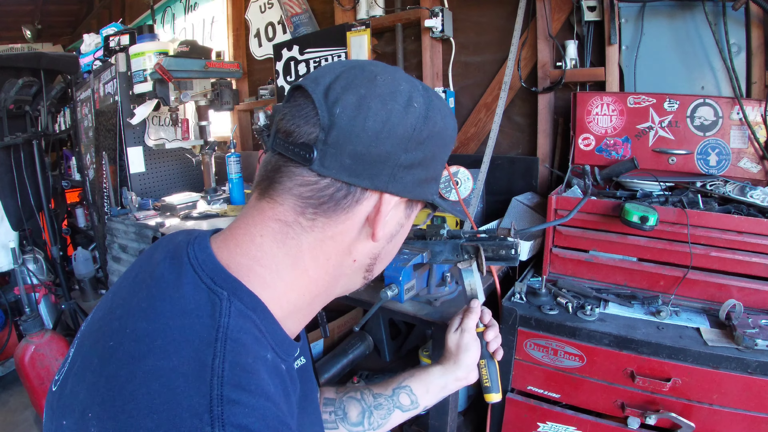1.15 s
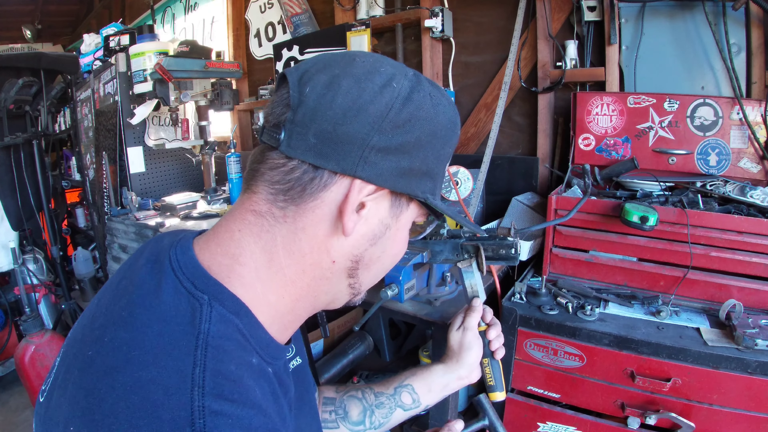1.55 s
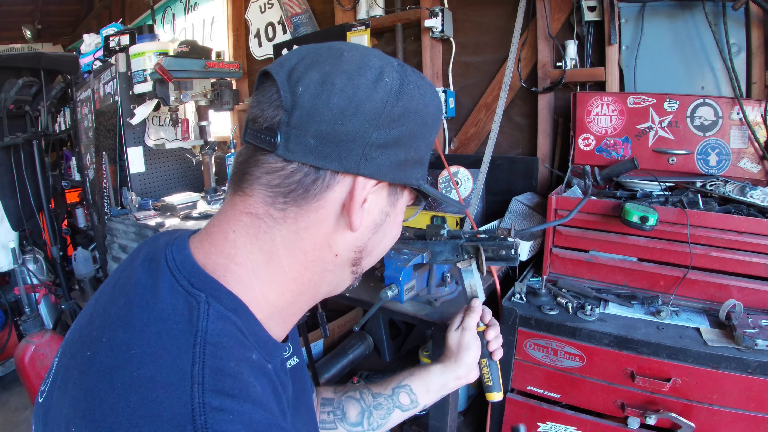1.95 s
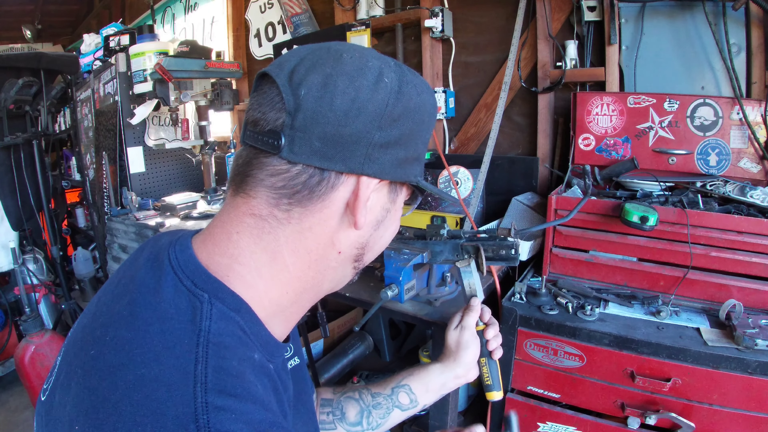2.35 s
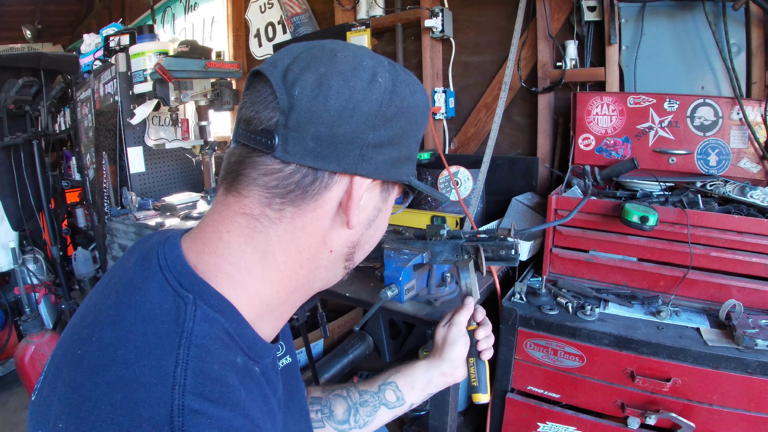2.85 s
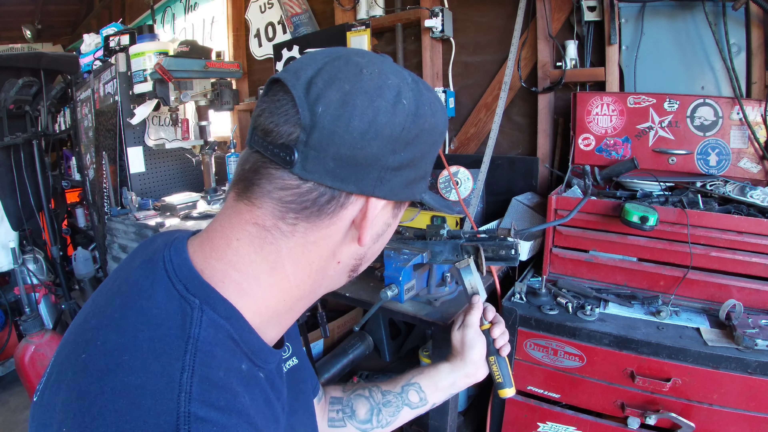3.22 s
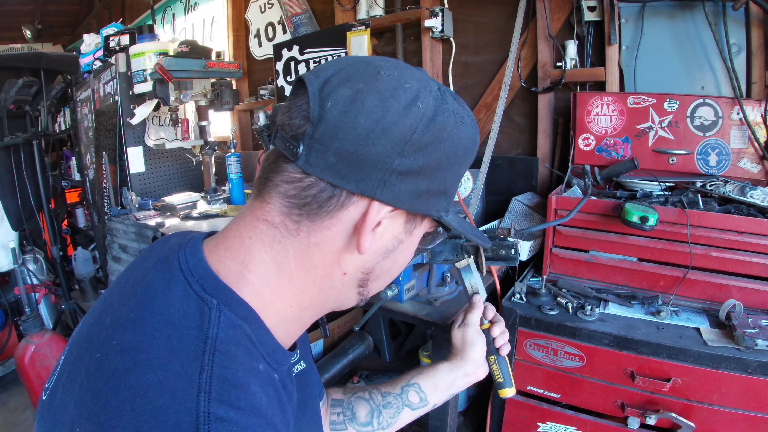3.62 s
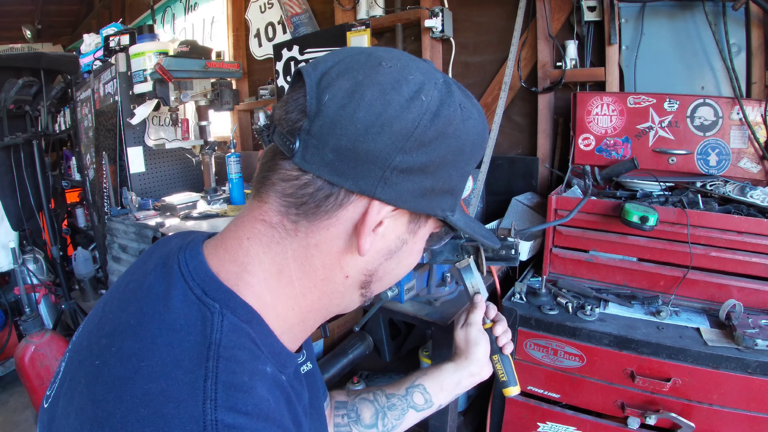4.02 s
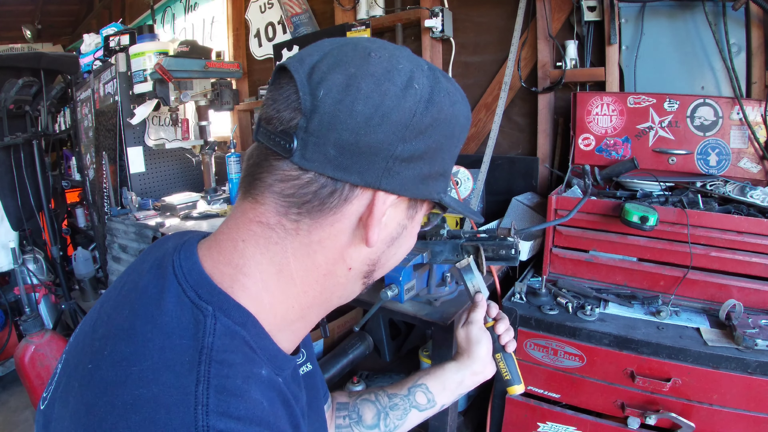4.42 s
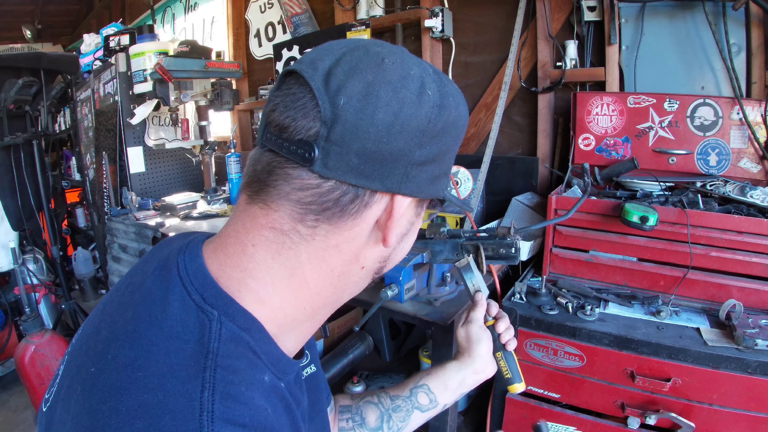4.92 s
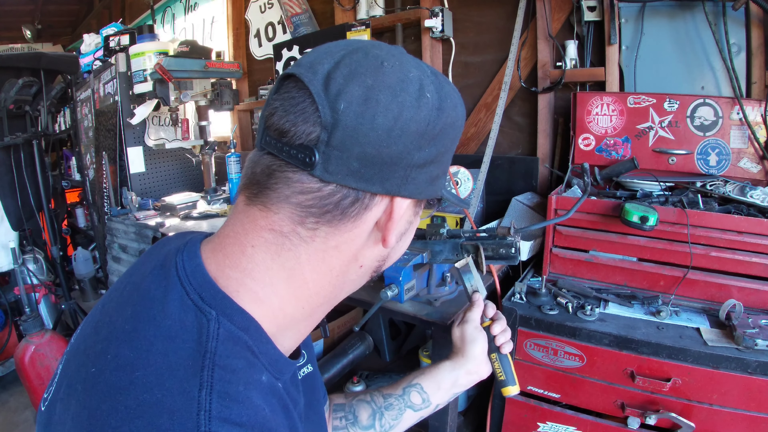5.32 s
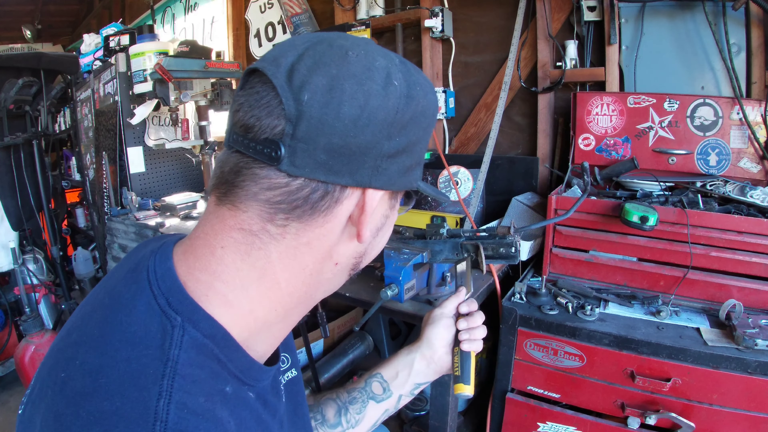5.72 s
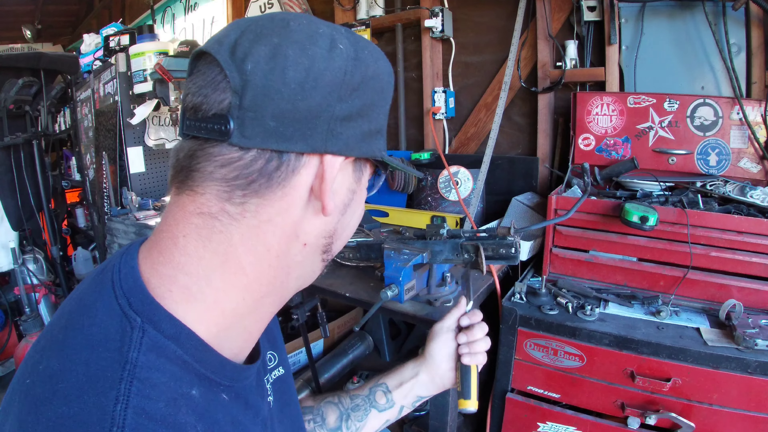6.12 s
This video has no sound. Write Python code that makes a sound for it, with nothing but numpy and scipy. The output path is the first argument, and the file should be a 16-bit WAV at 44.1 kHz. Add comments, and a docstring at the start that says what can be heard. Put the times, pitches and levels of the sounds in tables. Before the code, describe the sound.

Light steel taps and creaks, then two bursts of sharp hammer blows on a screwdriver against clamped steel, loose tools rattling on a garage bench.

```python
"""Light steel taps and short creaks over a faint garage drone, then two bursts of hammer blows.
A hammer drives a screwdriver against a steel bracket in a vise: each blow cracks in the shaft, rings
the steel and shakes the workbench, whose loose tools chatter and clink while a metal panel hums on.
Between bursts the blade is set anew with taps and creaks; a few more taps close the scene.
Struck bodies are resonances and decaying sines; rough contacts are shaped noise."""
import sys
import numpy as np
from scipy import signal
from scipy.fft import rfft, irfft
from scipy.io import wavfile
from scipy.ndimage import uniform_filter1d, minimum_filter1d, map_coordinates

SR = 44100
rng = np.random.default_rng(int(sys.argv[2]) if len(sys.argv) > 2 else 0)


def log_audio(samples):
    """Write samples as a 16-bit WAV file to the path given in sys.argv[1]."""
    # one column per channel
    frames = np.atleast_2d(samples).T
    # limit to full scale, then quantise
    limited = np.clip(frames, -1, 1)
    pcm = np.round(limited * 32767).astype(np.int16)
    wavfile.write(sys.argv[1], SR, pcm)


N = 280917  # length of the scene in samples
T = np.arange(SR) / SR  # seconds since a contact
HZ = np.fft.rfftfreq(2 * SR, 1 / SR)  # frequency grid of all responses
TOP_HZ = 15400  # upper band limit of the output, also the highest jingle pitch


def amp(db):
    """Decibels to gain."""
    return 10 ** (np.asarray(db) / 20)


def unit(x):
    """Scale x to rms 1."""
    return x / np.sqrt(np.mean(x ** 2) + 1e-20)


def along(points, hz):
    """Read a curve of (Hz, value) points at hz, straight lines on a log frequency axis."""
    point_hz, values = np.transpose(points)
    return np.interp(np.log(hz + 1), np.log(point_hz + 1), values)


def resonances(modes):
    """Causal response of damped (Hz, width Hz, peak dB) modes, with alternating signs."""
    response = 0
    for k, (hz, width, db) in enumerate(modes):
        mode = 1j * HZ * width / (hz * hz - HZ ** 2 + 1j * HZ * width)
        response = response + (-1) ** k * amp(db) * mode
    return response


def shelf(db, corner_hz, order=6):
    """A treble shelf: db of gain well above the corner, none below."""
    return amp(db / (1 + (corner_hz / (HZ + 1)) ** order))


def colour(x, response):
    """One second of x through a response."""
    return irfft(rfft(x, 2 * SR) * response)[:SR]


def grains(response, spiky_db):
    """A second of dense tiny contacts: noise of randomly uneven size through a response, rms 1."""
    unevenness = np.interp(T, np.linspace(0, 1, num=700), rng.standard_normal(size=700))
    sizes = amp(spiky_db * unevenness)
    return unit(colour(sizes * rng.standard_normal(SR), response))


def fade(rise, t60, hold=0, sag_db=0):
    """Envelope that rises, sags by sag_db during hold, then dies away (times in seconds)."""
    sag = -sag_db * np.minimum(T / (hold + 1e-6), 1)
    decay = -60 * np.maximum(T - hold, 0) / t60
    return (1 - np.exp(-T / rise)) * amp(sag + decay)


def add(track, s, sound):
    """Mix a sound in at time s in seconds."""
    i = max(round(s * SR), 0)
    track[i:i + len(sound)] += sound[:N - i]


# How fast the garage swallows sound.
# Each row: frequency in Hz, time to fall by 60 dB in seconds.
GARAGE_DECAY = [(100, 0.67), (400, 0.42), (2000, 0.34), (6000, 0.34), (12000, 0.049)]


def in_garage(x, wet_db):
    """Add the garage's diffuse tail: noise whose treble dies first."""
    hz, t, z = signal.stft(rng.standard_normal(SR), SR, nperseg=256)
    decay = amp(-60 * t / along(GARAGE_DECAY, hz)[:, None])
    tail = signal.istft(z * decay, SR, nperseg=256)[1]
    return x + amp(wet_db) * signal.fftconvolve(x, tail / np.linalg.norm(tail))[:SR]


# Spectrum of the still air, before the room level is set.
# Each row: frequency in Hz, relative level in dB.
AIR_SPECTRUM = [(25, -8), (60, -13.5), (100, -15), (140, -12.5), (250, -6.5), (340, -16.5), (600, -17.5),
                (1000, -21), (2000, -34.5), (7000, -38.5), (10000, -52.5), (15000, -65.5)]
# Tones of the faint low drone.
# Each row: frequency in Hz, width in Hz, relative peak in dB.
DRONE_MODES = [(137.7, 12, -1), (162, 28, -6), (208, 6.4, -2.5), (258, 3.3, -3.5)]


def room_tone():
    """Still garage air with a faint low drone: steady noise through a spectrum and narrow peaks."""
    spectrum = np.hypot(amp(along(AIR_SPECTRUM, HZ)), np.abs(resonances(DRONE_MODES)))
    fine_spectrum = np.interp(np.fft.rfftfreq(N, 1 / SR), HZ, spectrum)
    air = irfft(rfft(rng.standard_normal(N)) * fine_spectrum, N)
    return amp(-56.0) * unit(air)


# Sheet metal drumming on after a blow.
# One row: frequency in Hz, level after a 0 dB crack in dB, time to fall by 60 dB in seconds.
PANEL_HUM = (74, -59.5, 14)


def panel():
    """A metal panel hums at one slightly wavering pitch; every blow tops up its slowly dying energy."""
    hz, db, t60 = PANEL_HUM
    t = np.arange(N) / SR
    energy = np.zeros(N)
    for s, crack_db, *rest in BLOWS_STRUCK:
        energy += (t > s) * amp(crack_db - 60 * np.abs(t - s) / t60) ** 2
    drift = map_coordinates(rng.standard_normal(size=40), [t * 3])  # three random points a second
    return amp(db) * np.sqrt(energy) * np.sin(2 * np.pi * hz * t + .3 * drift)


# Stick-slip creaks.
# Each row: start in seconds, end of pressure in seconds, level in dB, treble in dB.
CREAK_STROKES = [(0.111, 0.188, -43.5, -21), (0.985, 1.019, -42, -8.5), (1.19, 1.351, -39, -8.5),
                 (3.811, 3.813, -36, -6.5), (3.863, 3.864, -39.5, -5.5), (3.931, 3.961, -38.5, -3.5)]
# Modes of the creaking body.
# Each row: frequency in Hz, width in Hz, relative peak in dB.
CREAK_MODES = [(475, 39.6, 6), (536, 100, 0.5), (640, 88, -4), (813, 32, -2.5), (1380, 120, -11),
               (1600, 72, -10), (2100, 270, -12.5), (2570, 60, -12.5), (3220, 160, -36), (4780, 240, -16.5)]
# Rise in seconds of a creak with 0 dB treble; it doubles with each such loss of treble in dB.
CREAK_RISE_S, CREAK_SOFTENS_DB = 0.0013, 9


def creaks():
    """Under even pressure the blade slips in quick steps; each rings the work and scratches grittily."""
    out = np.zeros(N)
    body = resonances(CREAK_MODES)
    for start, end, db, treble_db in CREAK_STROKES:
        gaps, sizes = rng.standard_normal((2, 90))
        times = np.cumsum(0.0055 * np.exp(.45 * gaps))  # seconds
        times -= times[0]
        live = times < .3
        slips = np.bincount((times[live] * SR).astype(int), amp(1.9 * sizes[live]), SR)
        scratches = signal.fftconvolve(slips, fade(rise=0.00069, t60=0.027))[:SR]
        grit = scratches * grains(amp(along(TAP_SPECTRUM, HZ)), spiky_db=2.5)
        tone = body * shelf(treble_db, corner_hz=1100) * shelf(-17.5, corner_hz=8000)
        creak = unit(colour(slips, tone)) + amp(treble_db - 6.5) * unit(grit)
        creak = in_garage(creak, wet_db=-2)
        # the pressing hand keeps the loudness even until it lets go
        creak /= np.sqrt(np.abs(uniform_filter1d(creak ** 2, size=900)) + 1e-2)
        rise = CREAK_RISE_S * 2 ** (-treble_db / CREAK_SOFTENS_DB)
        stroke = fade(rise=rise, t60=0.24, hold=abs(end - start), sag_db=0.5)
        add(out, start, amp(db) * creak * stroke)
    return out


# Light contacts of steel on steel.
# Each row: start in seconds, level in dB, treble in dB, upper edge in Hz, knock on the bench in dB.
LIGHT_TAPS = [(.002, -41.5, 3, 9100, -54.5), (.455, -43, -13.5, 9000, -49.5),
              (0.603, -37.5, -22.5, 8900, -63), (.692, -35.5, -9.5, 9000, -66),
              (3.1622, -40, -6, 8500, -56), (3.54, -38, -2.5, 9100, -43), (6.053, -36, -7.5, 5470, -35),
              (6.122, -21, -3.5, 6200, -30), (6.22, -32, -3.5, 5640, -37.5)]
# Broad spectrum of steel touching steel, also the grit in the creaks.
# Each row: frequency in Hz, relative level in dB.
TAP_SPECTRUM = [(250, -12), (700, 11), (1500, -6), (3300, 3.5), (5500, -1.5), (7400, -7), (9500, -21.5),
                (15000, -53)]
# Modes of the lightly touched screwdriver blade.
# Each row: frequency in Hz, width in Hz, relative peak in dB.
BLADE_MODES = [(1294, 59, 8), (1610, 114, 7.5), (2150, 160, 3.5), (3405, 120, 6), (5520, 330, 0)]
# How a light push reaches the bench.
# Each row: frequency in Hz, gain in dB.
PUSH_TO_BENCH = [(30, 5.5), (70, -10.5), (170, -8), (380, -2), (600, -2.5), (2000, -11)]
# Thin pings of the freed blade.
# Each row: start in seconds, end of the sustain in seconds, level in dB.
BLADE_PINGS = [(3.163, 3.166, -56), (6.22, 6.302, -68.5)]
PING_HZ = 8580
# Rise in seconds of a -40 dB tap; it doubles with each such gain in dB, so heavier ones build slower.
TAP_RISE_S, RISE_DOUBLES_DB = 0.0012, 4.5


def taps():
    """Steel touches steel in a noisy tick and knocks the bench; the freed blade pings as a high sine."""
    out = np.zeros(N)
    knock_colour = resonances(BENCH_MODES) * amp(along(PUSH_TO_BENCH, HZ))
    blade = np.hypot(amp(along(TAP_SPECTRUM, HZ)), amp(1.5) * np.abs(resonances(BLADE_MODES)))
    for s, db, treble_db, edge_hz, knock_db in LIGHT_TAPS:
        rise = TAP_RISE_S * 2 ** ((db + 40) / RISE_DOUBLES_DB)
        upper_edge = 1 / np.sqrt(1 + (HZ / edge_hz) ** 16)
        tone = blade * shelf(treble_db, corner_hz=3160) * upper_edge
        tick = amp(db) * grains(tone, spiky_db=1) * fade(rise=rise, t60=0.067)
        knock = amp(knock_db) * grains(knock_colour, spiky_db=4)
        knock *= fade(rise=0.01, t60=0.43, hold=0.042, sag_db=0.5)
        add(out, s, in_garage(tick, wet_db=1.0) + knock)
    for start, end, db in BLADE_PINGS:
        ping = amp(db) * np.sin(2 * np.pi * PING_HZ * T)
        add(out, start, ping * fade(rise=0.0033, t60=0.053, hold=abs(end - start)))
    return out


# Bouts of loose metal rocking on the bench after a blow.
# Each row: first landing in seconds, end of the bout in seconds, level of the first landing in dB.
ROCKING_BOUTS = [(2.112, 2.27, -25.5), (2.4, 2.46, -30.5), (2.648, 2.92, -29.5), (4.437, 4.6, -25.5),
                 (4.856, 4.92, -49.5), (5.204, 5.26, -37.5), (5.504, 5.95, -37)]
# Spectrum of a landing.
# Each row: frequency in Hz, relative level in dB.
CLINK_SPECTRUM = [(800, -21), (3000, -3), (4300, -2), (5200, 3), (5800, -2), (7400, -3), (9000, -21),
                  (15000, -46)]
ROCK_PERIOD_S, ROCK_LOSS_DB = .099, 5.5  # from one landing to the next
CLINK_TREBLE_DB, CLINK_TREBLE_GROWS = -1, 1  # treble after a 0 dB crack, growth in dB per dB of crack


def clinks():
    """Loose metal rocks at an even pace, each landing a weaker buzz; a sharper last blow brightens it."""
    out = np.zeros(N)
    for start, end, db in ROCKING_BOUTS:
        crack_db = [blow[1] for blow in BLOWS_STRUCK if blow[0] < start][-1]
        treble_db = CLINK_TREBLE_DB + CLINK_TREBLE_GROWS * crack_db
        tone = amp(along(CLINK_SPECTRUM, HZ)) * shelf(treble_db, corner_hz=6100, order=16)
        for k, s in enumerate(np.arange(start, end, ROCK_PERIOD_S)):
            buzz = amp(db - ROCK_LOSS_DB * k) * grains(tone, spiky_db=-1.5)
            buzz *= fade(rise=0.0078, t60=0.096, hold=0.0071, sag_db=-0.5)
            add(out, s, in_garage(buzz, wet_db=-3.5))
    return out


def jingle(pitch_hz, spread, t60, seconds, count=40):
    """Single small tools touch at random moments, each ringing briefly as a sine at its own pitch."""
    pitch, size = rng.standard_normal((count, 2)).T[:, :, None]
    start = (rng.random((count, 1)) * seconds * SR).astype(int)
    t = T[:SR // 8]
    hz = np.minimum(pitch_hz * np.exp(spread * np.tanh(pitch)), TOP_HZ)
    rings = amp(1.8 * size - 60 * t / t60) * np.sin(2 * np.pi * hz * t)
    return np.bincount((start + np.arange(len(t))).ravel(), rings.ravel(), SR)


# Modes of the bracket and vise.
# Each row: frequency in Hz, typical relative level in dB, time to fall by 60 dB in seconds.
STEEL_MODES = [(1420, -7, .15), (1585, -2, .11), (1688, -6, .3), (2010, -10, .25), (3000, -6, .1),
               (3245, -2, .1), (3340, -6, .15), (3850, -5, .14), (4054, -9, .25), (4523, -8, .18),
               (5083, -6, .24), (6110, -12, .13), (6800, -14, .13), (7751, -21, .3)]


def steel_ring(scatter_db, blur):
    """The bracket's modes, at new strengths for every contact; the buzzing clamp blurs their phase."""
    hz, db, t60 = np.transpose(STEEL_MODES)[:, :, None]
    level = db + scatter_db * rng.standard_normal(hz.shape)
    t = T[:SR // 3]
    wander = np.cumsum(rng.standard_normal((len(hz), len(t))), axis=1) / np.sqrt(SR)
    phase = rng.random(hz.shape) + blur * wander  # in cycles
    ring = np.sum(amp(level - 60 * t / t60) * np.sin(2 * np.pi * (hz * t + phase)), axis=0)
    return np.pad(ring, (0, SR - len(t)))


# Hammer blows and one rebound.
# Each row: start in seconds, crack peak in dB, force passed on to the bench in dB,
# shaking time in seconds.
BLOWS_STRUCK = [(1.6759, 5.5, -35, 0.094), (1.773, -9.5, -41.5, .02), (2.0122, 3, -30.5, 0.14),
                (2.2781, 2, -30, 0.11), (2.5476, 5, -37.5, .17), (3.9923, 6, -30.5, 0.16),
                (4.3267, 5, -27, 0.18), (4.6484, 0.5, -21.5, .12), (4.9729, -16, -20.5, 0.11),
                (5.302, -19.5, -20.5, 0.11)]
# Modes of the hand-damped screwdriver.
# Each row: frequency in Hz, width in Hz, relative peak in dB.
SHAFT_MODES = [(1600, 33, -10.5), (3350, 670, -5), (5520, 730, -5), (6395, 470, -8)]
# Modes of the workbench, also knocked by the taps.
# Each row: frequency in Hz, width in Hz, relative peak in dB.
BENCH_MODES = [(39.1, 44, -5), (83.4, 11.4, 5), (107.5, 14, 1), (172.2, 18.8, 6.5), (229, 90, -5),
               (363.7, 45.7, 7), (426.5, 92, 1), (604, 26, -2.5)]
# Modes of the loose tools.
# Each row: frequency in Hz, width in Hz, relative peak in dB.
TOOL_MODES = [(802, 30, 9), (1053, 16, 8.5), (1275, 11, 4.5), (1655, 49, 7), (1960, 56, 2), (2420, 31, 0.5),
              (3830, 17, 7.5), (4050, 10, -13), (4523, 30, -7.5), (4920, 60, 1.5), (5200, 65, -6.5),
              (7180, 41, -6.5), (7300, 13, -7.5), (8210, 32, -13)]
# Spectrum of the noisy part of the clang.
# Each row: frequency in Hz, relative level in dB.
CLANG_SPECTRUM = [(300, -18), (900, -13), (1550, -1.5), (2300, -7.5), (3400, -4.5), (4400, -4.5),
                  (5500, -2.5), (6800, -5), (8000, -9), (11000, -23), (15000, -36.5)]
# Broad spectrum of the chattering tools.
# Each row: frequency in Hz, relative level in dB.
CHATTER_SPECTRUM = [(150, -8), (450, 7), (1000, 4), (1700, 2), (2600, 1), (3600, 0), (5400, -4.5),
                    (7300, -15), (8600, -26.5), (11000, -37), (15000, -59)]
# clang and chatter grow with the force: gain at the usual force (dB) and growth (dB per dB)
USUAL_FORCE_DB = -30
CLANG_DB, CLANG_GROWS = -21, 0.51
CHATTER_DB, CHATTER_GROWS = -27, 0.55
# a sharper crack brightens what it sets off: treble after a 0 dB crack (dB) and growth (dB per dB)
HARDNESS_DB, HARDNESS_GROWS = -5, 0.61
SPARKLE_DB, SPARKLE_GROWS = 5, 0.69
PUSH_DB = 4  # peak of the bench's first heave, relative to the force


def hammering():
    """Each blow: a crack in the shaft, a clang of the vise, then the shaken bench and its tools."""
    out = np.zeros(N)
    shaft, bench = resonances(SHAFT_MODES), resonances(BENCH_MODES)
    heave = colour(T == 0, bench / (1 + 1j * HZ / 200) ** 2)  # a single softened push
    heave *= amp(PUSH_DB) / np.abs(heave).max()
    clang_colour = amp(along(CLANG_SPECTRUM, HZ))
    chatter_colour = amp(along(CHATTER_SPECTRUM, HZ))
    tools = np.hypot(chatter_colour, np.abs(resonances(TOOL_MODES)))
    for s, crack_db, force_db, shaking in BLOWS_STRUCK:
        extra_db = force_db - USUAL_FORCE_DB
        hardness = shelf(HARDNESS_DB + HARDNESS_GROWS * crack_db, corner_hz=4400)

        crack = colour(T == T[round(.0003 * SR)], shaft * hardness)  # one impulse 0.3 ms in
        crack *= amp(crack_db) / np.abs(crack).max()

        clang = amp(3.5) * grains(clang_colour * hardness, spiky_db=10) * fade(rise=0.00018, t60=0.12)
        clang += amp(-8) * steel_ring(scatter_db=5.0, blur=2.2)
        clang *= amp(CLANG_DB + CLANG_GROWS * extra_db)

        # loose tools chatter while the bench shakes; a sharp crack wakes the smallest ones too
        sparkle_db = SPARKLE_DB + SPARKLE_GROWS * crack_db
        brightness = shelf(sparkle_db, corner_hz=6200, order=16)
        brightness = brightness * shelf(-sparkle_db, corner_hz=10500, order=16)
        touches = jingle(pitch_hz=3753, spread=.7, t60=.06, seconds=0.41)
        chatter = grains(tools * brightness, spiky_db=-1.5)
        chatter += amp(-5) * colour(touches, brightness * chatter_colour)
        chatter *= amp(CHATTER_DB + CHATTER_GROWS * extra_db)
        chatter *= fade(rise=0.0092, t60=0.57, hold=shaking, sag_db=7.0)

        # the bench shakes, then settles slowly and keeps the tools faintly buzzing
        thud = grains(bench * shelf(-0.5 + 0.34 * extra_db, corner_hz=287), spiky_db=-1.5)
        settling = amp(-14) * fade(rise=0.016, t60=2.77)
        thud *= fade(rise=0.0041, t60=0.5, hold=shaking, sag_db=3.5) + settling
        buzz = grains(tools * brightness * shelf(-4.5, corner_hz=6540), spiky_db=1.0)
        thud += amp(-25.5) * buzz * fade(rise=0.067, t60=2.5)

        add(out, s, crack + clang + chatter + amp(force_db) * (thud + heave))
    return out


def scene():
    """All sources, heard alike in both channels."""
    mono = room_tone() + panel() + creaks() + taps() + clinks() + hammering()
    return np.array([mono, mono])


CEILING_DB = 1  # where the limiter aims to hold the peaks


def record(dry):
    """A fast limiter holds the cracks down, the rest clips softly, and a steep low-pass ends the band."""
    needed = np.minimum(1, amp(CEILING_DB) / (np.abs(dry) + 1e-9))
    gain = uniform_filter1d(minimum_filter1d(needed, size=15), size=15)
    limited = dry * gain
    clipped = limited / (1 + np.abs(limited) ** 12) ** (1 / 12)
    low_pass = signal.ellip(10, .1, 80, TOP_HZ, fs=SR, output="sos")
    return signal.sosfilt(low_pass, clipped)


dry = scene()
out = record(dry)
log_audio(out)
```